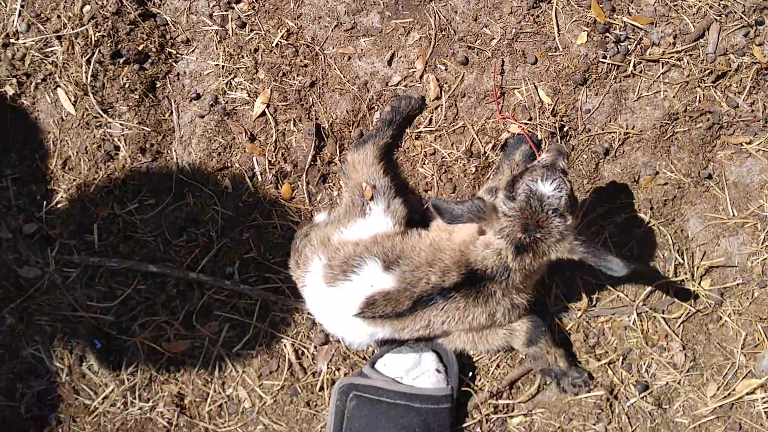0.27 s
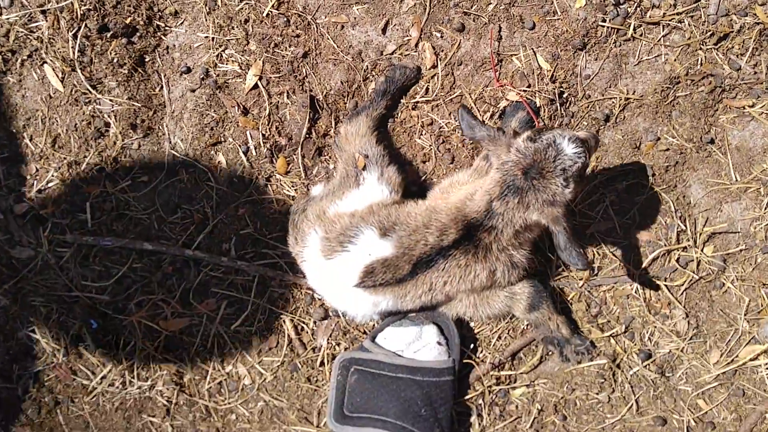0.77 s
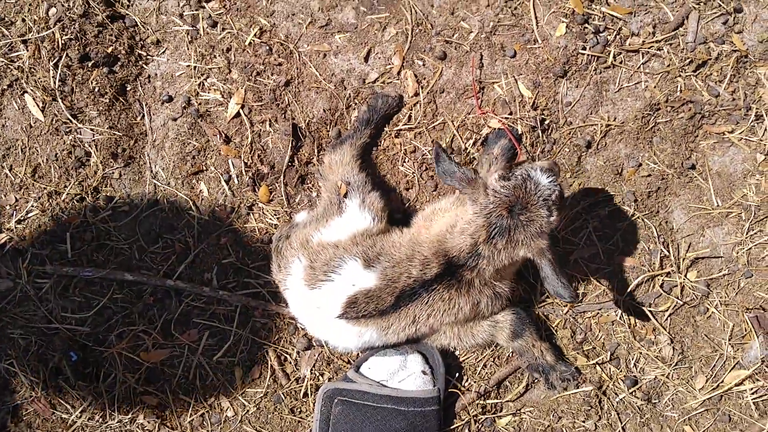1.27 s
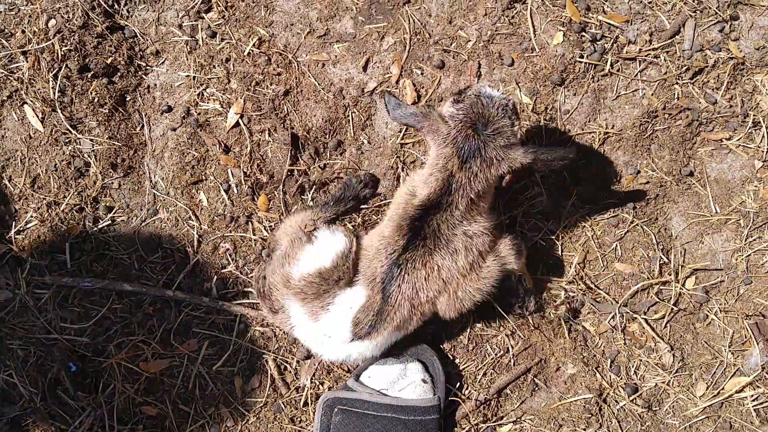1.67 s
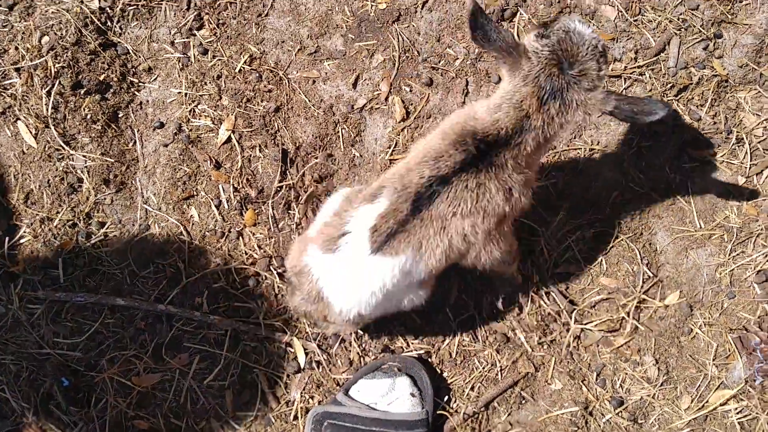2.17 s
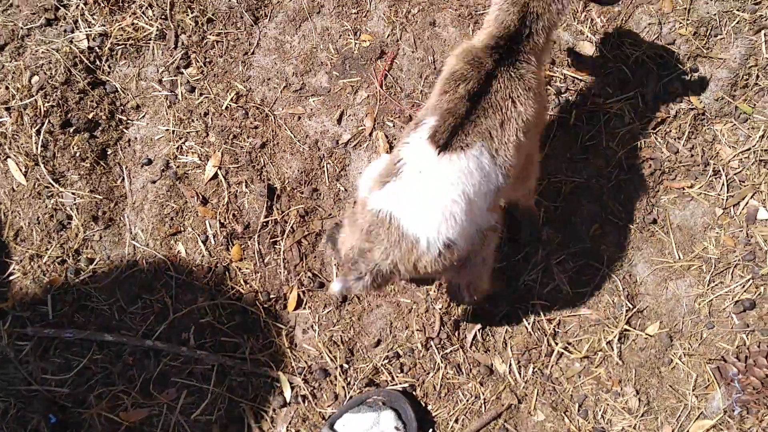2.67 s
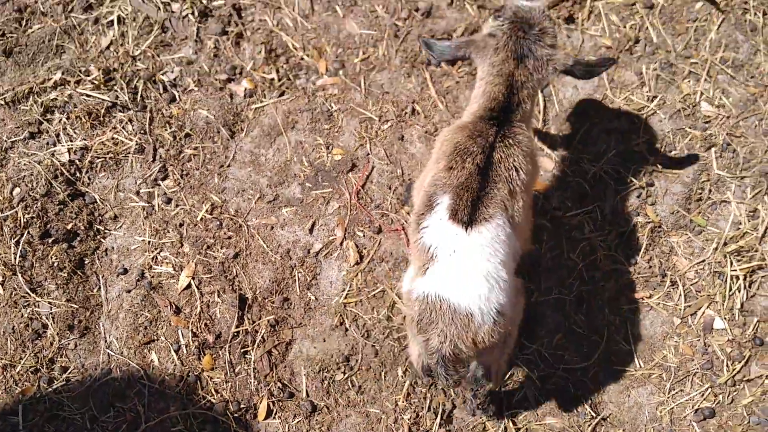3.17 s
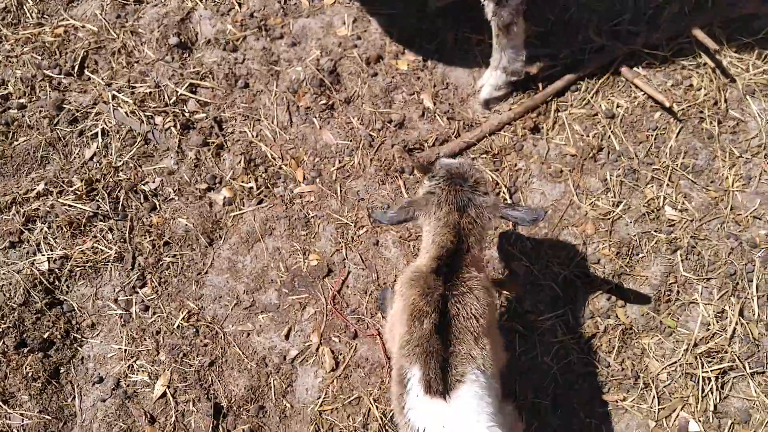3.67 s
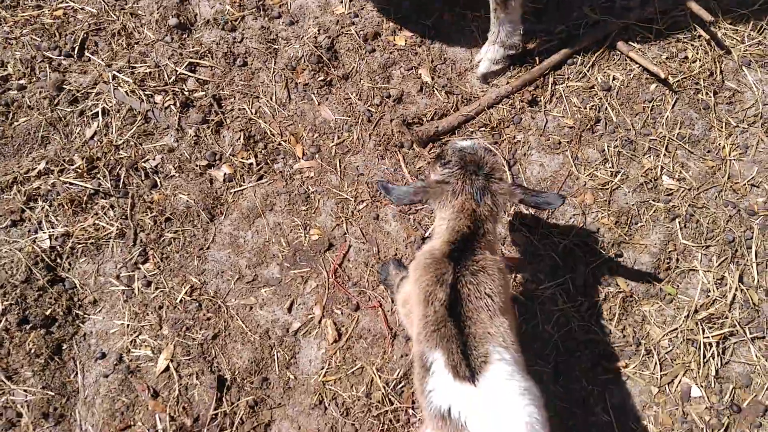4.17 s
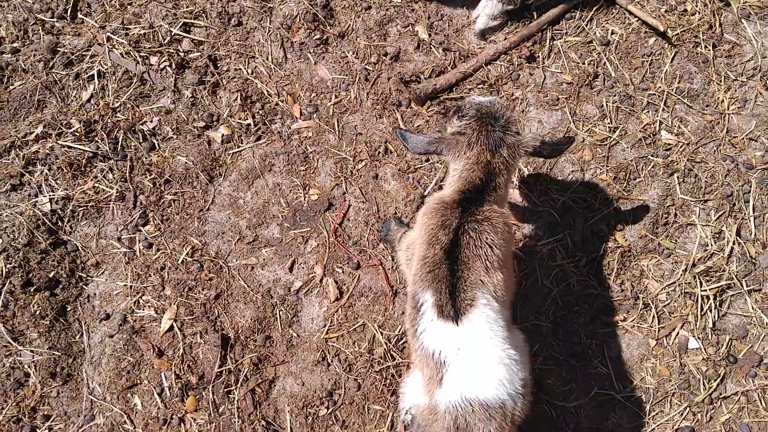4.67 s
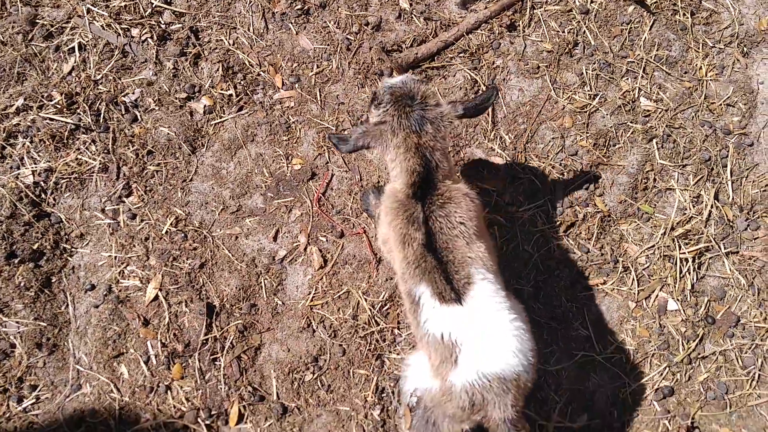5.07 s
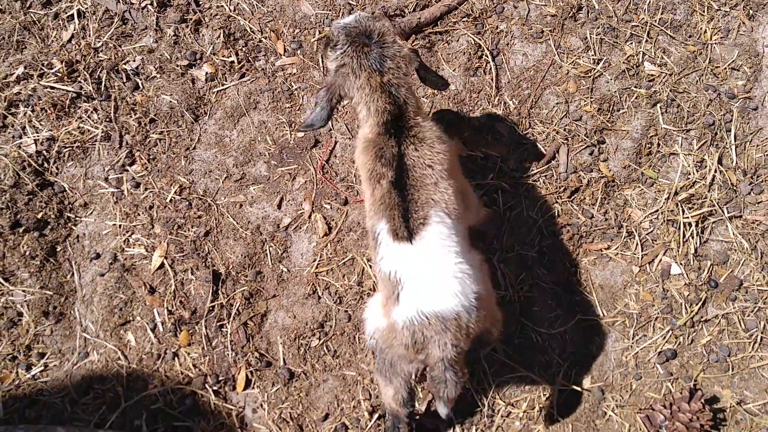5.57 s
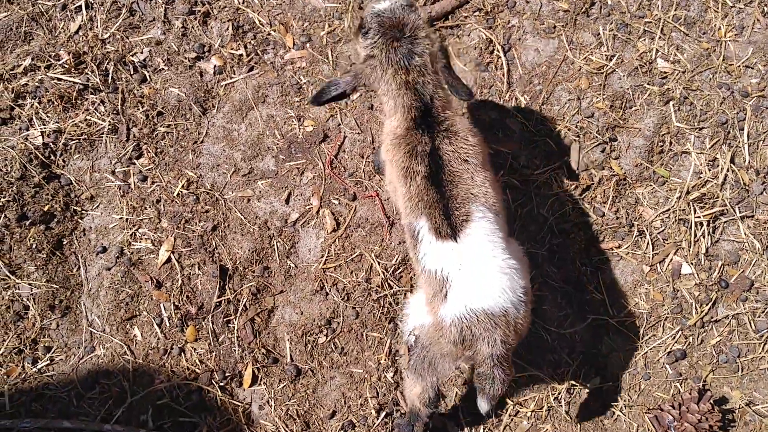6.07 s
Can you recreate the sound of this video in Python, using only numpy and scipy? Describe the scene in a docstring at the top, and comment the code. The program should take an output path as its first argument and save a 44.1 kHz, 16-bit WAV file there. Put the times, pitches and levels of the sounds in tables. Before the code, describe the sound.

A close microphone in a quiet, open farmyard. From 0 to 0.7 seconds a newborn goat gives a loud, shrill, nasal bleat, catching several times early on, then opening wider, turning rough and dropping in pitch before it cuts off with a slight outdoor echo. Soft gusts brush the microphone beneath it. From about 1.25 to 3.8 a far bird repeats faint, short falling whistles. Between 1.55 and 3 the kid scrambles up: scuffs on dirt, rustling straw, small dry snaps, and a tiny low squeak at 2.7. A few dull steps in loose soil follow from 3.4 to 4.3. At about 4.0 it bleats again, shorter and quieter, two syllables, breathy at first, ending in a puff of air. Around 4.9 to 5.5 another goat calls hoarsely far away. A tiny high squeak comes at 6.1. Low rumble and faint air hiss run throughout.

```python
"""A newborn goat kid gives one long, shrill bleat on farmyard dirt, close below the microphone.
It scrambles up through dry straw, squeaks, bleats briefly in two syllables and squeaks again: harmonics
and breath noise shaped by moving throats. Grains of noise scuff and shuffle, and short bursts snap stalks.
Far off, a bird repeats a falling sine whistle and another goat calls hoarsely. Filtered noise makes the
low outdoor rumble, the faint hiss of the air and soft gusts on the microphone; the yard adds echoes."""
import sys
import numpy as np
from scipy import signal
from scipy.fft import rfft, irfft, next_fast_len
from scipy.io import wavfile
from scipy.ndimage import uniform_filter1d

SR = 44100
rng = np.random.default_rng(int(sys.argv[2]) if len(sys.argv) > 2 else 0)


def materialize(psi):
    """Save the field psi as 16-bit PCM at rate SR to the path in sys.argv[1].

    A 1-D psi becomes a single channel; in a 2-D psi each row is a channel.
    """
    bounded = np.clip(np.atleast_2d(psi).T, -1, 1)
    quanta = np.round(bounded * 32767).astype(np.int16)
    wavfile.write(sys.argv[1], SR, quanta)


N = 279153
TIME = np.arange(N) / SR
EDGE_HZ = 15750  # upper band edge
STEP_S = .001  # spacing of the rows that steer a call


def amp(db):
    """Decibels to gain."""
    return 10 ** (np.asarray(db) / 20)


def unit(x):
    """Scales to rms 1."""
    return x / np.sqrt(np.mean(x ** 2) + 1e-20)


def read(points, hz):
    """Interpolates a spectrum table on a log-frequency axis."""
    f, value = np.transpose(points)
    return np.interp(np.log(hz + 1), np.log(f + 1), value)


def add(mix, s, sound):
    """Mixes a sound in at time s."""
    part = mix[max(0, round(s * SR)):][:len(sound)]
    part += sound[:len(part)]


def colour(x, spectrum):
    """Filters by a spectrum table, to rms 1."""
    size = next_fast_len(len(x) + 512)
    gain = amp(read(spectrum, np.fft.rfftfreq(size, 1 / SR)))
    return unit(irfft(rfft(x, size) * gain, size)[:len(x)])


def wander(size, hz):
    """Smooth random motion up to about hz."""
    knots = rng.standard_normal(int(size * 2 * hz / SR) + 4)
    fine = signal.resample_poly(knots, 8, 1)
    return np.interp(np.arange(size) * 16 * hz / SR, np.arange(len(fine)), fine)


def ease(t, at, span):
    """A smooth step from 0 to 1 around a moment."""
    return .5 + .5 * np.tanh((t - at) / (2 * span))


def bump(t, at, width):
    """A smooth rise to 1 and back around a moment."""
    return np.exp(-((t - at) / width) ** 2)


def since(t, at):
    """Time passed since a moment, zero before it."""
    return np.maximum(t - at, 0)


def rub(start, end, spectrum, grain_db=3, swell=.8):
    """A stroke of many tiny noise grains that swells and fades."""
    size = max(int((end - start) * SR), 500)
    grains = rng.standard_normal(size) * amp(grain_db * wander(size, 500))
    return colour(grains, spectrum) * np.sin(np.pi * np.arange(size) / size) ** abs(swell)


def call(rows, throats, jitter=.001, rasp=.025, flutter_db=1, shake_db=9, half_db=-38, hiss=.5, smear=.04):
    """Vocal folds drive a throat that moves from one shape to the next."""
    # air rushing through the folds: (frequency [Hz], gain [dB])
    aspiration = [(500, -14), (3600, -9), (5000, 1.5), (9000, 0), (15500, 2)]
    s, *columns = np.transpose(rows)
    t = np.arange(s[0], s[-1], 1 / SR)
    size = len(t)
    # the steering is smoothed over 300 samples
    steering = (uniform_filter1d(np.interp(t, s, c), size=300) for c in columns)
    pitch, level_db, mouth, rough = steering
    rough = np.clip(rough, 0, 1)
    mouth = np.clip(mouth, 0, len(throats) - 1)
    shares = [np.maximum(1 - abs(mouth - k), 0) for k in range(len(throats))]

    # slack folds beat unevenly
    uneven = 1 + (jitter + rasp * rough) * wander(size, 220)
    phase = 2 * np.pi * np.cumsum(pitch * uneven) / SR
    k = np.arange(1, 37)[:, None]  # harmonic numbers
    gain_db = sum(share * read(throat, k * pitch) for share, throat in zip(shares, throats))

    # each harmonic drifts a little, and shakes fast when the voice turns rough
    shake = shake_db * np.minimum(rough, .3)
    drift_db = np.array([flutter_db * wander(size, 10) + shake * wander(size, 70) for _ in k])
    gain = amp(gain_db + drift_db) * (k * pitch < EDGE_HZ + pitch)

    # the throat rings after each closure (causal phase), and the closure is spread over part of the cycle
    circle = np.concatenate([gain_db[:1], gain_db, gain_db[-2::-1]]) * np.log(10) / 20
    lag = signal.hilbert(circle, axis=0).imag[1:len(k) + 1] + smear * k ** 2
    tone = (gain * np.cos(k * phase - lag)).sum(0) / np.sqrt((gain ** 2).sum(0) / 2)
    # alternate cycles differ slightly: weak lines between the harmonics
    tone *= 1 + amp(half_db) * (1 + wander(size, 20)) * np.cos(phase / 2)

    puffs = colour(rng.standard_normal(size), aspiration) * (1 + .7 * np.cos(phase))
    turbulence = sum(share * colour(puffs, throat) for share, throat in zip(shares, throats))
    voice = np.sqrt(1 - rough ** 2) * tone + hiss * rough * turbulence
    return s[0], amp(level_db) * voice * signal.windows.tukey(size, 200 / size)


def kid():
    """The kid's four calls, each a voice through its own throats, and a hiss in the long bleat."""
    # throat shapes of the long bleat, in order of mouth position: (frequency [Hz], gain [dB])
    nasal = [(600, -35), (1400, -31.5), (2100, -13.5), (2900, -27.5), (4300, -13), (5700, -12.5),
             (7000, -10), (8400, 2.5), (9200, -7.5), (9900, -1.5), (10700, -8), (13500, -16), (15500, -15)]
    pinched = [(640, -27), (1280, -18), (1910, -19.5), (2550, -7.5), (3190, -17.5), (3820, -12),
               (4460, -10.5), (5100, -6), (5740, -12), (7000, -8), (7650, 2), (8300, -1.5), (9550, -12.5),
               (10200, -8.5), (10900, -19.5), (15500, -30.5)]
    open_mouth = [(640, -28.5), (1300, -18.5), (1940, -25.5), (2560, -7), (3300, -8.5), (3880, -11),
                  (4500, -5), (5200, -7), (7750, -7.5), (8420, 1.5), (9050, -15.5), (9700, -11),
                  (12800, -25.5), (15500, -28.5)]
    wide = [(600, -26), (1230, -11), (1870, -10), (2450, -3), (3150, -15), (4350, 3.5), (5000, -11.5),
            (6200, -13.5), (7400, -4), (8200, -6.5), (9300, -23.5), (10000, -16), (13000, -25.5),
            (15500, -55)]
    slack = [(400, -31.5), (950, -3), (1550, -5), (2200, 0), (3300, -2), (4400, -0.5), (6000, -10.5),
             (8200, -5.5), (9000, -12), (10000, -10.5), (15500, -36)]
    closing = [(420, -19), (900, 13.5), (1350, 4), (2200, -9.5), (4000, -32.5), (8000, -17.5),
               (15500, -35.5)]
    # further throat shapes of the short bleat: (frequency [Hz], gain [dB])
    squeezed = [(550, -15), (1050, 6), (1550, -32), (2150, -3), (3000, -15.5), (4000, -23.5), (5600, -16),
                (6900, -2.5), (7900, -2.5), (9200, -11), (10900, 0.5), (12700, -19), (15500, -25)]
    half_open = [(640, -29), (1290, -15), (1930, -6.5), (2580, -15.5), (3220, -6), (3870, -11.5),
                 (4510, -3.5), (5160, -14.5), (5800, -8), (6440, -14.5), (7100, -10), (8400, -14),
                 (9050, -19), (9700, -9), (11600, -8.5), (13000, -24)]
    breathy = [(500, -31), (1100, 8), (1550, -31), (2100, 4), (2700, -6), (3300, 2), (3900, -30),
               (5800, -20), (8300, -16.5), (9200, -28), (15500, -36)]
    # throat shapes of the two squeaks: (frequency [Hz], gain [dB])
    first_squeak_throat = [(410, -35), (820, -19.5), (1230, 2.5), (1640, -13), (2050, -10.5), (2460, -2.5),
                           (2870, -20), (3700, -20), (4200, -42), (9000, -50)]
    last_squeak_throat = [(1200, -19.5), (2400, -0.5), (3600, -15), (4800, -23), (8000, -45)]
    # squeaks: (start [s], length [s], top pitch before its bends [Hz], mid level [dB])
    squeaks = [(2.667, .048, 412.3, -43.5), (6.122, 0.0416, 1207, -50.5)]
    out = np.zeros(N)
    long_throats = [nasal, pinched, open_mouth, wide, slack, closing]
    add(out, *call(long_bleat(), long_throats, jitter=0.00037, rasp=.022, flutter_db=1.7154,
                   shake_db=22.5, half_db=-34, hiss=1.1, smear=0.055))
    add(out, *high_hiss())
    short_throats = [squeezed, nasal, half_open, breathy]
    add(out, *call(short_bleat(), short_throats, jitter=0.001, rasp=0.027, flutter_db=1.5,
                   shake_db=9, hiss=0.65, smear=0.053))
    for row, throat in zip(squeaks, [first_squeak_throat, last_squeak_throat]):
        add(out, *call(squeak(*row), [throat], rasp=0.059, hiss=1.0))
    return out


def long_bleat():
    """A held note sags as breath runs out; the jaw drops, the folds slacken and the voice cuts off."""
    length_s, note_hz, note_db = .714, 650.1, -16
    sag_hz, sag_power = 25.5, 3.3
    # slack folds: pitch and level drop, and the voice turns rough (0-1)
    slack_after_s, slack_s, slack_drop_hz, slack_db, slack_rough = .6725, .0182, 227.7, -8, 0.5
    jaw_after_s, jaw_drop_s, jaw_slack_shapes = .593, .008, 1.8
    cut_after_s, cut_db_per_s = 0.6852, 1201
    t = np.arange(0, length_s, STEP_S)
    slack = ease(t, slack_after_s, slack_s)
    pitch = note_hz - sag_hz * (t / length_s) ** sag_power - slack_drop_hz * slack
    level_db = note_db + slack_db * slack - cut_db_per_s * since(t, cut_after_s)
    mouth = 2 + ease(t, jaw_after_s, jaw_drop_s) + jaw_slack_shapes * slack
    return with_catches(t, pitch, level_db, mouth, slack_rough * slack ** 2)


def with_catches(t, pitch, level_db, mouth, rough, pitch_power=2.2):
    """The mouth narrows and chokes a bleat; rows of (s, Hz, dB, position along its throats, roughness)."""
    # catches: (time [s], half-width [s], level change [dB], pitch shift [Hz], narrowing [throat shapes])
    catches = [(-.015, .038, -14.5, 22, 0.83), (.089, 0.034, -17, 61.5, 2.2), (.2, .027, -3.5, -17, 0.76),
               (.246, 0.027, -7, -10.5, 0.9043), (4.077, 0.038, -26, 57, 2.1),
               (4.18, 0.0097, 4, -11.5, 0.5)]
    skew = 0.23  # a catch sets in faster and lets go slower by this share of its half-width
    clean_rough, choked_rough = 0.024, 0.14  # roughness of a held note, and what a full choke adds
    for s, width, dip_db, shift_hz, narrowing in catches:
        choke = bump(t, s, width * (1 + skew * np.sign(t - s)))
        pitch = pitch + shift_hz * choke ** pitch_power
        level_db = level_db + dip_db * choke
        mouth = mouth - narrowing * choke
        rough = rough + choked_rough * (1 - amp(dip_db * choke)) ** 2
    return np.column_stack([t, pitch, level_db, mouth, clean_rough + rough])


def high_hiss():
    """A brief high hiss breaks out as the long bleat pushes past its deepest catch."""
    # spectrum of the hiss: (frequency [Hz], gain [dB])
    hiss_spectrum = [(8500, -40), (9500, -9), (10000, 0), (10600, -8.5), (12000, -40)]
    start_s, end_s, level_db = 0.13, .188, -32
    return start_s, amp(level_db) * rub(start_s, end_s, hiss_spectrum)


def yard(x, near_db=-24, near_fade=0.034, tail_db=-30):
    """Quick reflections from the ground and things nearby, then a thin, diffuse tail from the yard."""
    # decay of the tail: (frequency [Hz], time to fall 60 dB [s])
    yard_decay = [(500, .35), (2000, .42), (5000, .4), (8000, .38), (12000, .25), (16000, .2)]
    # spectrum of the tail: (frequency [Hz], gain [dB])
    echo_colour = [(500, -1), (1200, 1.5), (2300, -2.5), (3300, -2), (4500, -4), (6000, 2), (8300, 0),
                   (9500, -2), (15500, -2.5)]
    size = SR * 3 // 4
    t = np.arange(size) / SR
    # sparse reflections of either sign, about 2500 a second
    taps = rng.choice([-1., 1.], size) * (rng.random(size) < 2500 / SR)
    near = taps * (t > .003) * np.exp(-t / near_fade)
    hz, frames, z = signal.stft(taps * (t > .02), SR, nperseg=256)
    decay = amp(-60 * frames / read(yard_decay, hz)[:, None])
    tail = signal.istft(z * decay, SR, nperseg=256)[1][:size]
    tail = colour(tail, echo_colour)
    # the long paths keep shifting, which blurs steady tones in the tail
    blurred = x * np.sqrt(2) * np.cos(3 * wander(N, 25))
    early = signal.oaconvolve(x, near / np.linalg.norm(near))[:N]
    late = signal.oaconvolve(blurred, tail / np.linalg.norm(tail))[:N]
    return x + amp(near_db) * early + amp(tail_db) * late


def outdoors():
    """Lumpy low rumble under a faint, even hiss; a few soft gusts brush the microphone."""
    # spectrum of the low rumble: (frequency [Hz], gain [dB])
    rumble = [(20, -50), (31, -25.5), (42, -9.5), (52, -1.5), (70, -1.5), (120, -2.5), (142, -9.5),
              (168, -7), (190, -11.5), (310, -16), (420, -21.5), (520, -32), (800, -71)]
    # spectrum of the faint hiss: (frequency [Hz], gain [dB])
    air = [(290, -57.5), (500, -31.5), (545, -12.5), (603, -3.5), (759, -0.5), (1260, -8.5), (2370, -13.5),
           (2580, -13.5), (4590, -17), (6120, -15.5), (7270, -11.5), (8400, -13.5), (9160, -22),
           (10400, -19), (15600, -21.5)]
    # spectrum of a gust: (frequency [Hz], gain [dB])
    gust_spectrum = [(15, -25.5), (35, -6.5), (55, 1.5), (85, 0), (130, -14.5), (300, -32.5), (700, -71)]
    # breeze on the microphone: (start [s], end [s], peak level [dB])
    breeze = [(0.275, 0.39, -59), (0.45, 0.543, -56.5), (0.669, 0.883, -53.5)]
    rumble_db, air_db = -61.5, -64
    out = colour(rng.standard_normal(N), rumble) * amp(rumble_db + 1 * wander(N, 4.6))
    for start, end, db in breeze:
        gust = np.interp(TIME, [start, (start + end) / 2, end], [0, 1, 0]) ** .5
        out += amp(db) * gust * colour(rng.standard_normal(N), gust_spectrum)
    return out + colour(rng.standard_normal(N), air) * amp(air_db + .5 * wander(N, 3.2))


def bird(top_hz=4050, bottom_hz=1450, fall=.095, fade=0.395):
    """Each far whistle is a sine that slides down and weakens, blurred by distance."""
    # falling whistles: (start [s], level before flutter and fade [dB])
    whistles = [(1.25, -73), (1.96, -67), (2.3, -67.5), (2.63, -69.5), (2.96, -69), (3.28, -71),
                (3.66, -72)]
    out, t = np.zeros(N), np.arange(0, .19, 1 / SR)
    for s, db in whistles:
        slide_hz = bottom_hz + (top_hz - bottom_hz) * np.exp(-t / fall)
        hz = slide_hz * (1 + .025 * wander(len(t), 200))
        flutter = amp(db + 3 * wander(len(t), 35))
        level = flutter * np.exp(-t / fade) * signal.windows.tukey(len(t), .2)
        add(out, s, level * np.sin(2 * np.pi * np.cumsum(hz) / SR))
    return out


def ground():
    """Noise strokes scuff over dirt and straw and shuffle in soil; decaying bursts are snapping stalks."""
    # scuffs of hooves and fur: (start [s], end [s], level before swell [dB], share of straw to dirt [0-1])
    scuffs = [(1.554, 1.706, -54, 0.06), (1.661, 1.806, -57, 0.83), (1.858, 2.005, -58.5, 0.01),
              (1.979, 2.14, -64, 0.35), (2.121, 2.26, -55.5, 0.84), (2.199, 2.452, -64, 0.33),
              (2.339, 2.492, -60.5, 0.64), (2.569, 2.775, -61, 0.88), (2.769, 2.967, -60.5, 1),
              (3.388, 3.53, -66.5, 0), (3.701, 3.754, -56.5, 0.75)]
    # spectra of scuffed dirt and straw: (frequency [Hz], gain [dB])
    dirt_spectrum = [(150, -5.5), (330, 4), (500, -16.5), (800, -6), (1700, -4), (2800, -4.5), (4000, -4.5),
                     (6500, -3.5), (8500, -10.5), (15500, -24.5)]
    straw_spectrum = [(500, -6.5), (3000, -9), (6000, -4.5), (9000, -3), (10500, 0.5), (13000, -6.5),
                      (15500, -3.5)]
    # dull shuffles of steps in loose soil: (start [s], end [s], level before swell [dB])
    shuffles = [(2.474, 2.625, -62), (3.401, 3.526, -69), (3.719, 3.919, -62.5), (3.853, 4.009, -51.5),
                (4.211, 4.3, -59.5)]
    # spectrum of the loose soil: (frequency [Hz], gain [dB])
    soil_spectrum = [(71, -34.5), (120, -18), (187, -17), (290, -7), (507, -21.5), (568, -12.5),
                     (842, -8.5), (1270, -23), (1700, -27), (2070, -34), (6000, -38.5), (7800, -61),
                     (13200, -120)]
    # snapping stalks: (time [s], level 6.5 dB under the peak [dB], pitch [Hz])
    snaps = [(2.019, -49, 3550), (2.033, -50.5, 2380), (2.0587, -56, 2040), (2.2867, -55.5, 2020),
             (2.3993, -51, 4510), (2.4126, -54, 2120), (2.5498, -54.5, 1990), (2.7253, -53, 2800),
             (2.7402, -49.5, 3780), (3.1772, -56.5, 1900), (3.3332, -53, 3080), (4.6833, -59, 4280),
             (4.8563, -57.5, 3020)]
    out = np.zeros(N)
    for start, end, db, straw in scuffs:
        straw = np.clip(straw, 0, 1)
        on_straw = np.sqrt(straw) * rub(start, end, straw_spectrum, swell=0.25)
        on_dirt = np.sqrt(1 - straw) * rub(start, end, dirt_spectrum, swell=0.39)
        add(out, start, amp(db) * (on_straw + on_dirt))
    for start, end, db in shuffles:
        add(out, start, amp(db) * rub(start, end, soil_spectrum, grain_db=0.0, swell=0.5))
    t = np.arange(1500) / SR
    for s, db, hz in snaps:
        burst = rng.standard_normal(len(t)) * np.exp(-t / 0.0029)
        snap = colour(burst, [(hz / 3, -14), (hz, 0), (hz * 3, -22)])
        add(out, s, amp(db + 6.5) * snap / abs(snap).max())
    return out


def squeak(start, length, top_hz, db, rough_top=0.082, rough_ends=0.275):
    """Pitch and level rise and fall together; the voice is cleanest at the top."""
    scoop, droop, bend_s = 0.15, .05, 0.0067  # shares of the pitch missing at start and end
    ends_db = -21.5  # level at the ends against the middle
    t = np.arange(0, length, STEP_S)
    bend = scoop * np.exp(-t / bend_s) + droop * np.exp((t - length) / bend_s)
    off_top = (2 * t / length - 1) ** 2
    rough = rough_top + (rough_ends - rough_top) * off_top
    return np.column_stack([start + t, top_hz * (1 - bend), db + ends_db * off_top, np.zeros(len(t)), rough])


def short_bleat(onset_db=-25):
    """A squeezed, breathy scoop clears and opens, swells to a brief note and ends in a puff of air."""
    start_s, length_s, note_hz, peak_db = 3.972, .3, 643.2, -27.5
    scoop_hz, scoop_after_s, scoop_s, scoop_rough = 211, .044, 0.014, 0.83
    clear_after_s, open_after_s, change_s = 0.065, 0.077, .006
    attack_s, peak_after_s, swell_db_per_s, release_db_per_s = 0.025, 0.19, 73, 525.5
    puff_after_s, puff_s, puff_db = 0.255, 0.022, -49
    t = np.arange(0, length_s, STEP_S)
    pitch = note_hz - scoop_hz * (1 - ease(t, scoop_after_s, scoop_s))
    attack_db = onset_db * since(attack_s, t) / attack_s
    swell_db = -swell_db_per_s * since(peak_after_s, t)
    release_db = -release_db_per_s * since(t, peak_after_s)
    voice = amp(peak_db + attack_db + swell_db + release_db)
    puff = amp(puff_db) * bump(t, puff_after_s, puff_s)
    level = np.hypot(voice, puff)
    air = puff / level
    mouth = 2 * ease(t, open_after_s, change_s) + air ** 2
    rough = scoop_rough * (1 - ease(t, clear_after_s, change_s)) + air
    return with_catches(start_s + t, pitch, 20 * np.log10(level), mouth, rough)


def far_bleat(onset_db=-13, voiced_s=0.066, opening=0.77, clearing=0.6):
    """A call swells, slides down one step and fades; the mouth opens and the voice clears at the slide."""
    start_s, length_s, note_hz, note_db = 4.85, .69, 560, -61.5
    drop_hz, slide_after_s, slide_s = 130, .32, .04
    attack_s, fade_after_s, fade_db_per_s = .14, 0.31, 44
    t = np.arange(0, length_s, STEP_S)
    voiced = bump(t, slide_after_s, voiced_s)
    pitch = note_hz - drop_hz * ease(t, slide_after_s, slide_s)
    attack_db = onset_db * since(attack_s, t) / attack_s
    level_db = note_db + attack_db - fade_db_per_s * since(t, fade_after_s)
    return np.column_stack([start_s + t, pitch, level_db, opening * voiced, 1 - clearing * voiced])


def far_goat():
    """A hoarse bleat from across the yard: mostly turbulent breath, barely voiced as it falls."""
    # hoarse throat shapes, at rest and opened: (frequency [Hz], gain [dB])
    hoarse = [(500, -3), (1300, -5.5), (2400, -2), (3200, -0.5), (3850, 1.5), (4450, -19.5), (6500, -18),
              (8500, -21), (10000, -27), (15500, -44.5)]
    hoarse_open = [(500, -19), (1030, 8), (1500, -2), (2100, -13), (2900, 2), (3800, -4.5), (4500, -13),
                   (8000, -12), (15500, -39)]
    out = np.zeros(N)
    add(out, *call(far_bleat(), [hoarse, hoarse_open], rasp=0.023, hiss=1))
    return out


def scene():
    """The yard answers more strongly once the kid has turned away; both channels are alike."""
    voice, turned = kid(), TIME > 2
    facing = yard(voice * ~turned, near_db=-16.0, near_fade=.012, tail_db=-30)
    away = yard(voice * turned, near_db=-16, near_fade=0.0115, tail_db=-24.5)
    far = far_goat() + yard(bird(), near_db=-15.5, near_fade=0.019, tail_db=-3.5)
    return np.tile(facing + away + far + ground() + outdoors(), (2, 1))


def record(dry):
    """The recorder's band limit, a low-pass filter."""
    low_pass = signal.firwin(511, EDGE_HZ, window=("kaiser", 9), fs=SR)
    return signal.oaconvolve(dry, low_pass[None], "same")


dry = scene()
out = record(dry)
materialize(out)
```